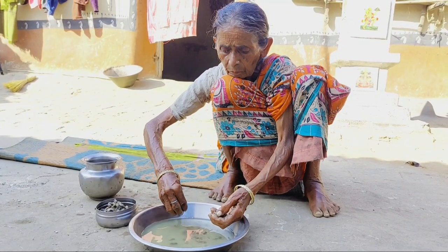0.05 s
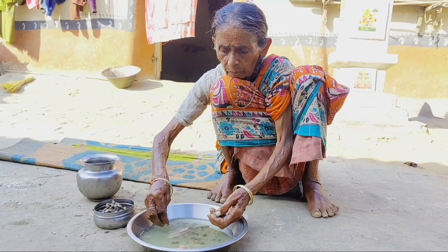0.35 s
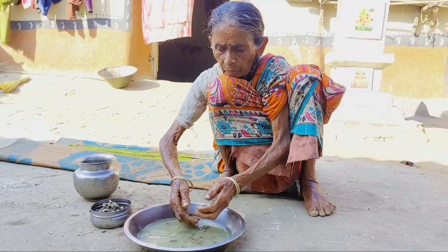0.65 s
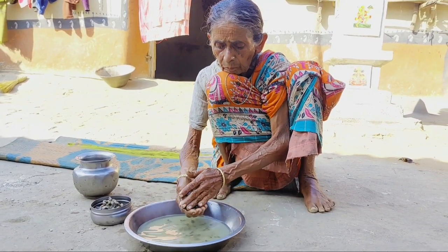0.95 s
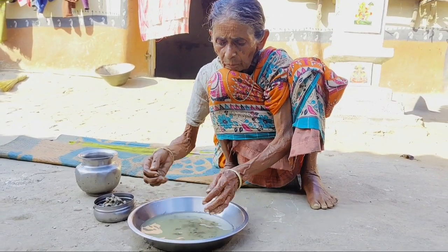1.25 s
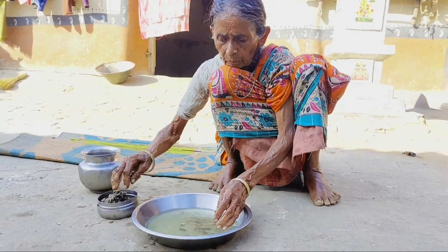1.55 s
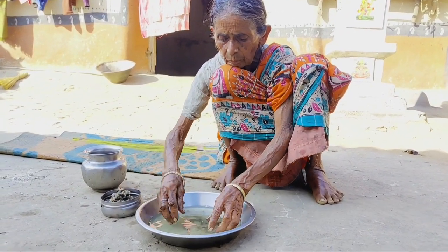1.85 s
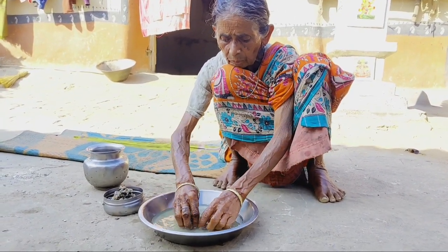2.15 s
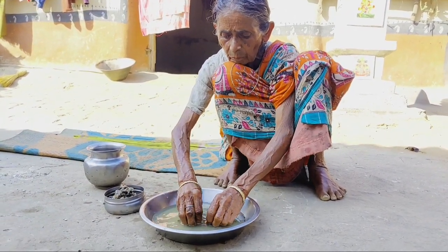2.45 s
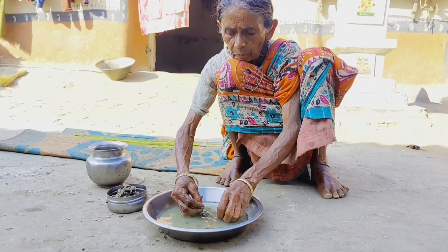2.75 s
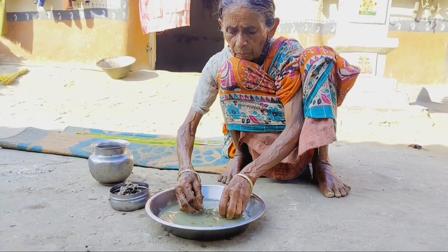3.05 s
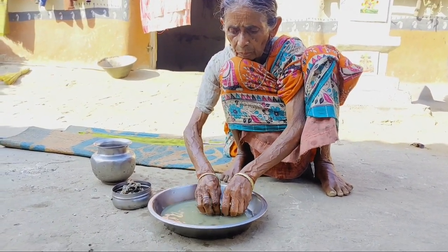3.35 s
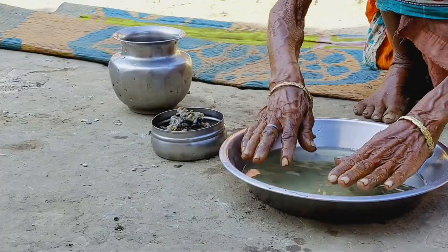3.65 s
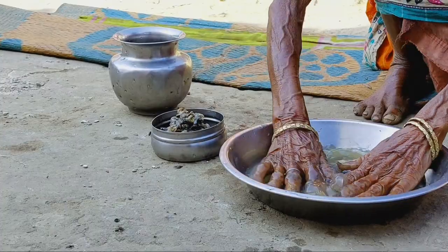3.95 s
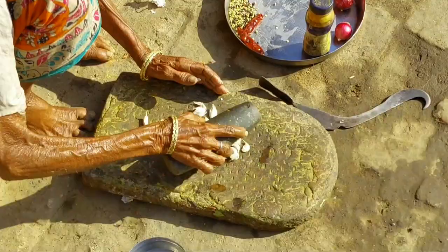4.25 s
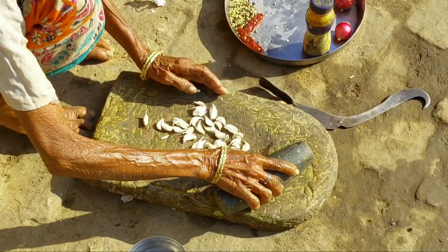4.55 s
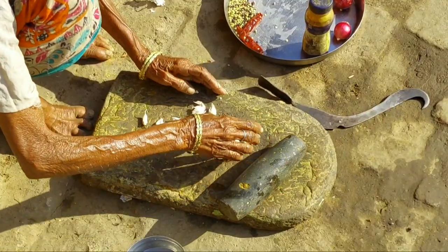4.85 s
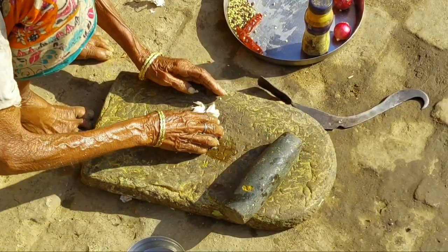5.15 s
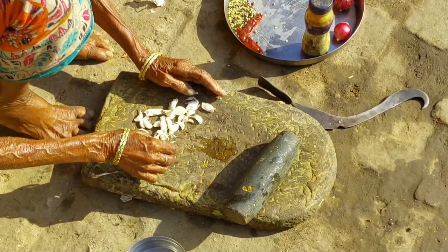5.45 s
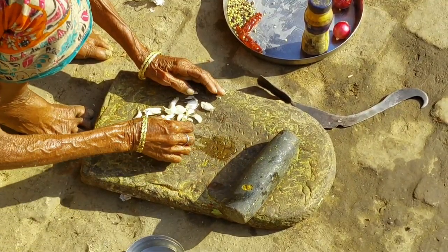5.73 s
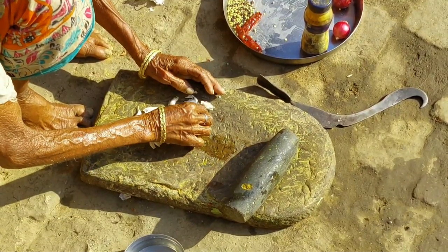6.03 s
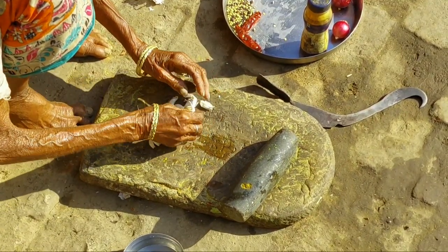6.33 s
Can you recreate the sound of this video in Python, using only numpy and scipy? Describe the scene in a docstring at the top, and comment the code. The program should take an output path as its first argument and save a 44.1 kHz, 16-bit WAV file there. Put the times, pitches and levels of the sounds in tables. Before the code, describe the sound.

Chicks peep throughout this outdoor yard scene, joined for the first two thirds by a hen's short, rough clucks. Light sloshing in a steel pan grows into splashes and plinking drops, and a few chicks give longer falling cries. Then comes the loudest sound, a nearby stone roller knocking once on a slab, followed by a dull scuff and the faint rustle of garlic skins. Everything echoes briefly off the house walls.

```python
"""Hen and chicks in a village yard

A hen clucks in rough pulses from her throat while her chicks whistle short, falling peeps.
Someone washes food in a steel pan of water, and bangles clink now and then. Then a stone roller
lands on a grinding slab with one hard, ringing knock, and a hand sweeps garlic cloves together.
A small bird calls far off, and the house walls give a short echo."""
import sys
import numpy as np
from scipy import signal
from scipy.io import wavfile

SR = 44100
rng = np.random.default_rng(int(sys.argv[2]) if len(sys.argv) > 2 else 0)


def transcribe(u):
    """Save the signal u as a 16-bit wav file named by the first command-line argument.

    u: samples, shape (n,) or (channels, n), limited to [-1, 1]; the rate is SR.
    q: integer samples, one column per channel.
    """
    v = np.clip(np.atleast_2d(u).T, -1, 1)
    q = np.round(v * 32767).astype(np.int16)
    wavfile.write(sys.argv[1], SR, q)


N = 290619
TIME = np.arange(N) / SR


def from_db(db):
    """Turn decibels into a number to multiply a sound by."""
    return 10 ** (np.asarray(db) / 20)


def unit_power(x):
    """Scale a sound so that its average power is 1."""
    return x / np.sqrt(np.mean(x ** 2) + 1e-20)


def at_hz(points, hz):
    """Read between the rows of a table of frequencies, spaced in octaves."""
    frequencies, values = np.transpose(points)
    return np.interp(np.log(hz), np.log(frequencies), values)


def cut(x, hz, kind, order=2):
    """Keep the lows, the highs or a band; a higher order cuts more sharply."""
    sections = signal.butter(order, np.clip(hz, 10, .45 * SR), kind, fs=SR, output="sos")
    return signal.sosfilt(sections, x + 1e-18)


def resonance(x, hz, width_hz):
    """Let through the sound near one frequency, as a hollow space does."""
    r = np.exp(-np.pi * width_hz / SR)
    feedback = [1, -2 * r * np.cos(2 * np.pi * hz / SR), r * r]
    return signal.lfilter(np.array([1, 0, -1]) * (1 - r * r) / 2, feedback, x + 1e-18)


def drift(per_s, size=N):
    """A random wobble, about 1 in size, that heads for a new value per_s times a second."""
    return np.interp(np.arange(size) * per_s / SR, np.arange(4000), rng.standard_normal(4000))


def panned(x, pan_db):
    """Place a sound: positive pan_db is to the left, negative to the right."""
    return x * from_db([[pan_db / 2], [-pan_db / 2]])


def add(out, start_s, x):
    """Mix x into out, beginning at start_s."""
    i = max(round(start_s * SR), 0)
    out[..., i:i + x.shape[-1]] += x[..., :max(N - i, 0)]


def loudness_curve(rows):
    """Join (time_s, level_db) points into a loudness that changes over time."""
    return from_db(np.interp(TIME, *np.transpose(rows)))


def stroke(start_s, length_s, rise, release_s):
    """Loudness of one movement: it builds over the share 'rise' of its length, holds, then fades."""
    build = np.clip((TIME - start_s) / (rise * length_s), 0, 1)
    return build * np.exp(-np.clip((TIME - start_s - length_s) / release_s, 0, 20))


# How alike noise is in the two ears: frequency_hz, likeness (0 to 1)
EAR_LIKENESS = [(60, 0.55), (400, 0.69), (1500, 0.073), (4000, 0.049), (12000, 0.063)]
def shaped_noise(spectrum, flicker_db, grains_per_s=0, spread_db=0):
    """Stereo noise, smooth or made of tiny clicks, in half-octave bands that each flicker."""
    feed = rng.standard_normal((2, 2, N))
    if grains_per_s:
        sizes = from_db(spread_db * np.minimum(rng.exponential(1, N), 4))
        feed = feed * sizes * (rng.random((2, 1, N)) < grains_per_s / SR)
    out, edges = np.zeros((2, N)), 22 * 2 ** np.arange(0, 10, .5)
    for k, (low, high) in enumerate(zip(edges, edges[1:])):
        if high < spectrum[0][0] or low > spectrum[-1][0]:
            continue
        hz = np.sqrt(low * high)
        mid, side = cut(feed[k % 2], [low, high], "band")
        alike = np.clip(at_hz(EAR_LIKENESS, hz), 0, 1)
        gain = from_db(at_hz(spectrum, hz) + flicker_db * drift(25))
        out += gain * (np.sqrt(1 + alike) * mid + np.sqrt(1 - alike) * side * [[1], [-1]])
    return unit_power(out)


def struck(blows, tones, rattle, lag_ms=0, ear_radians=0):
    """Each blow rings all of an object's tones, which fade 60 dB in ring_s, with a gritty crunch."""
    out, t = np.zeros((2, N)), np.arange(SR // 2) / SR
    ring = np.zeros((2, len(t)))
    for k, (hz, level_db, ring_s, pan_db) in enumerate(tones):
        tone = np.sin(2 * np.pi * hz * t - np.array([[0], [ear_radians]]))
        ring += (-1) ** k * panned(from_db(level_db - 60 * t / ring_s) * tone, pan_db)
    for start_s, strength_db in blows:
        for ear in (0, 1):
            add(out[ear], start_s + ear * lag_ms / 1000, from_db(strength_db) * ring[ear])
    size = SR // 25
    crunch = unit_power(rng.standard_normal((2, size)) * np.exp(-t[:size] / .007)) / np.sqrt(size)
    return out + rattle * signal.oaconvolve(out, crunch, axes=1)[:, :N]


def walls(x, early_db, tail_db, ring_s):
    """Add a few echoes from the ground and house fronts, then a blurred, fading tail."""
    t = np.arange(int(.7 * SR)) / SR
    mid, side = rng.standard_normal((2, len(t)))
    side = 0.75 * side + cut(side, 1276, "high")   # the ears differ more in the treble
    tail = (mid + side * [[1], [-1]]) * from_db(-60 * t / ring_s) * np.clip(t / 0.015 - .3, 0, 1)
    echo = from_db(tail_db) * unit_power(tail) / np.sqrt(len(t))
    for k, delay_s in enumerate([.009, .0135, .024, .037]):
        for ear in (0, 1):
            echo[ear, int(delay_s * SR) + rng.integers(0, 6)] += from_db(early_db - 2.1 * k)
    return x + signal.oaconvolve(x * np.ones((2, 1)), echo, axes=1)[:, :N]


# Loudness of the outdoor air: time_s, level_db
AIR_LEVEL = [(0, -65), (2.6, -62.5), (3.3, -61), (4.1, -55.5), (5.0, -53), (6.1, -58.5), (6.59, -59)]
# Tone of the still air by the house and the fuller air by the slab: frequency_hz, level_db
HOUSE_AIR = [(35, -1), (60, 10), (146, 10.5), (389, -7.5), (803, -13.5), (1620, -14), (2840, -86),
             (3760, -46.5), (4970, -39), (5860, -25), (6580, -21), (14600, -28), (16000, -50)]
SLAB_AIR = [(24, -35.5), (40, -13.5), (91, -5), (130, 0.5), (200, -6.5), (448, -8), (514, -19),
            (889, -20.5), (1150, -26), (1490, -31), (2400, -28.5), (3120, -63), (5280, -120)]
def yard_air(rumble_hz=55):
    """Still air gives way to fuller air and a faint hiss; a low rumble swells, then lingers."""
    by_slab = np.interp(TIME, [4.1, 4.45], [0, 1])
    calm = (1 - by_slab) * shaped_noise(HOUSE_AIR, flicker_db=2.7)
    fuller = by_slab * shaped_noise(SLAB_AIR, flicker_db=-0.2)
    hiss = by_slab * shaped_noise([(2000, -3), (5000, -3.5), (8000, 0), (15500, -10)], flicker_db=6.5)
    rumble = resonance(rng.standard_normal(N), rumble_hz, width_hz=20)
    rumble = unit_power(resonance(rumble, rumble_hz, width_hz=40))
    swell = from_db(-52) * stroke(4.3, 0.47, rise=0.4, release_s=0.19) + from_db(-69) * by_slab
    return loudness_curve(AIR_LEVEL) * (calm + fuller) + from_db(-74) * hiss + swell * rumble


# The far bird's loudness as it tires: time_s, level_db
BIRD_LEVEL = [(0, -62), (1.35, -61), (1.6, -72), (3.5, -70), (4.0, -90)]
# The lower band of its voice: frequency_hz, level_db
BIRD_VOICE = [(2800, -22), (3300, 0.5), (3900, 5), (4500, -18.5)]
def far_bird(first_s=.06, every_s=.191, half_note_s=.042, upper_hz=5850):
    """A small bird repeats one note, smeared by distance into two soft bands over faint chatter."""
    from_note_s = (TIME - first_s + every_s / 2) % every_s - every_s / 2
    swell = loudness_curve(BIRD_LEVEL) * np.exp(-(from_note_s / half_note_s) ** 2)
    lower = unit_power(cut(shaped_noise(BIRD_VOICE, flicker_db=2), 4400, "low", order=8))
    upper = resonance(rng.standard_normal((2, N)), upper_hz, width_hz=450)
    upper = unit_power(resonance(upper, upper_hz, width_hz=450))
    chatter = from_db(-79) * lower
    return swell * (from_db(-5) * lower + from_db(-9) * upper) + chatter


# Bangles touching: start_s, strength_db
BANGLE_CLINKS = [(1.672, 1), (4.4353, 7), (4.452, -1), (4.505, -25)]
# The tones they ring with: pitch_hz, level_db, ring_s, pan_db
BANGLE_TONES = [(7400, -55, .06, 0), (9470, -48, .06, -3), (10550, -50, .04, 0), (11150, -50, .05, 0),
                (14720, -50, .05, -2), (15430, -50, .05, -3)]
def bangles():
    """Bangles knock together and ring, very high and very briefly."""
    return from_db(-9) * struck(BANGLE_CLINKS, BANGLE_TONES, rattle=0.7, lag_ms=-.1)


# Knocks that ring the pan, a bangle's and lastly a splash's: start_s, strength_db
PAN_KNOCKS = [(3.5912, 2), (3.602, -19), (3.6105, -7), (3.669, -6.5)]
# Tones of the pan with water in it: pitch_hz, level_db, ring_s, pan_db
PAN_TONES = [(940, -50.5, 0.38, 1), (1296, -60, 0.4, 4), (1385, -37, 0.029, 13), (2730, -44.5, 0.028, -22),
             (2945, -47, 0.2, 3), (3740, -54, 0.13, 6), (5140, -47, 0.085, 9), (5210, -50, 0.13, 25),
             (5640, -53, 0.053, 7), (7420, -48, 0.044, -2), (9030, -66, 0.08, 6), (10800, -67, .07, -3),
             (11830, -66, .07, -2), (13100, -56, 0.064, -16)]
def steel_pan():
    """The steel pan rings and rattles when a bangle knocks against it or water splashes into it."""
    return from_db(-1.5) * struck(PAN_KNOCKS, PAN_TONES, rattle=0.93, lag_ms=0.19)


# Hands moving through the water: start_s, length_s, spray_db, slosh_db
WASH_STROKES = [(0.044, 0.16, -73, -88), (0.66, 0.037, -74.5, -101), (1.202, 0.042, -71, -68),
                (1.355, 0.016, -72, -94), (1.544, 0.03, -63, -56), (1.806, 0.065, -73.5, -90),
                (2.136, 0.1, -72.5, -88), (2.591, 0.028, -59, -59.5), (2.636, 0.086, -60, -74),
                (3.102, 0.17, -66, -73.5), (3.389, 0.017, -61.5, -60), (3.424, 0.013, -89, -60.5),
                (3.589, 0.0096, -49, -56.5), (3.663, 0.027, -54, -50.5), (3.745, 0.12, -59.5, -59.5),
                (3.957, 0.22, -52, -52.5), (4.248, 0.011, -63, -53.5)]
# Tone of the spray: frequency_hz, level_db
SPRAY_TONE = [(1800, -15), (2800, -5.5), (4000, 1.5), (5500, -6), (8000, -7), (12000, -10), (15500, -8.5)]
def washing(trickle_end_s=4.5):
    """Stirring makes fine spray, a wet crackle and a slosh of small bubbles."""
    spray = from_db(-82.5 + 4 * drift(4)) * (TIME < trickle_end_s)   # a trickle between strokes
    slosh = np.zeros(N)
    for start_s, length_s, spray_db, slosh_db in WASH_STROKES:
        push = stroke(start_s, length_s, rise=0.58, release_s=0.039)
        spray += from_db(spray_db) * push
        slosh += from_db(slosh_db) * push
    mist = shaped_noise(SPRAY_TONE, flicker_db=5, grains_per_s=8100, spread_db=0.5)
    crackle = shaped_noise(SPRAY_TONE, flicker_db=2, grains_per_s=350, spread_db=2)
    bubble_tone = [(600, -21.5), (950, 0.5), (1350, 10.5), (1900, -2), (2800, 7.5)]
    bubbles = shaped_noise(bubble_tone, flicker_db=-3, grains_per_s=1500, spread_db=3)
    return from_db(2.5) * (spray * mist + slosh * bubbles) + from_db(-3) * spray * crackle


# Single drops in the pan: start_s, pitch_hz, rise_octaves_per_s, ring_s, level_db
WATER_DROPS = [(2.58, 2670, 31, 0.18, -57), (4.053, 3320, 0.82, .04, -52), (4.111, 1190, 7.3, 0.1, -41),
               (4.125, 898, 6.5, .09, -40), (4.153, 1110, 6.8, .05, -34.5), (4.17, 3940, 89, 0.016, -28),
               (4.254, 1582, 6.9, 0.063, -36.5)]
def drops():
    """Each drop is a quick plink that rises in pitch by up to half an octave."""
    out, t = np.zeros((2, N)), np.arange(SR // 16) / SR
    for start_s, pitch_hz, rise, ring_s, level_db in WATER_DROPS:
        phase = 2 * np.pi * np.cumsum(pitch_hz * 2 ** np.minimum(rise * t, .5)) / SR
        loudness = from_db(level_db - 60 * t / ring_s) * (1 - np.exp(-t / 0.00056))
        add(out, start_s, np.sin(phase) * loudness)
    return out


# Small splashes and the snap of dry skins: start_s, level_db, pan_db
SNAPS = [(0.657, -52, 0), (2.599, -57, -2), (2.6653, -42.5, -2), (3.4617, -51, -8), (3.5916, -45, 0),
         (3.669, -38.5, 0), (3.964, -45, 0), (4.255, -45.5, 2), (4.57, -43, -7.5), (6.0716, -50.5, -4.5),
         (6.159, -54.5, -14.5), (6.2362, -53, -6)]
def snaps(gain_db=-5, snap_s=0.0045, spatter_s=0.007):
    """Tiny bright bursts of noise, each with a short spatter after it."""
    out, t = np.zeros((2, N)), np.arange(SR // 10) / SR
    fade = np.exp(-t / snap_s) + 0.11 * np.exp(-t / spatter_s)
    for start_s, level_db, pan_db in SNAPS:
        burst = cut(rng.standard_normal((2, len(t))) * fade, 3200, "high")
        add(out, start_s, panned(burst, pan_db) * from_db(level_db + gain_db))
    return out


# Cloves rustling over the slab, first shifted as the roller lands, then swept by hand: start_s, length_s,
# level_db
CLOVE_RUSTLES = [(4.575, .04, -61.5), (5.101, 0.22, -54), (5.4, 0.21, -66), (6.236, 0.099, -63.5),
                 (6.475, 0.041, -67.5)]
# Tone of their dry skins: frequency_hz, level_db
SKIN_TONE = [(2000, -10), (3000, 2), (5000, 2.5), (8000, 1.5), (12000, 2.5), (15500, 2)]
def garlic_cloves():
    """Dry garlic skins rustle in thousands of tiny clicks as they are shifted and swept together."""
    sweeps = sum(from_db(level_db) * stroke(start_s, length_s, rise=.7, release_s=.06)
                 for start_s, length_s, level_db in CLOVE_RUSTLES)
    return sweeps * shaped_noise(SKIN_TONE, flicker_db=2, grains_per_s=9000, spread_db=2)


# Tone of the scuff: frequency_hz, level_db
SCUFF_TONE = [(400, -15), (700, -4), (1000, -8.5), (1250, 1), (1600, -17.5), (2500, -33)]
def scuff(start_s=4.89, length_s=0.11, level_db=-42.5):
    """One short, dull scuff that swells and stops."""
    rub = unit_power(cut(shaped_noise(SCUFF_TONE, flicker_db=5), 1260, "low", order=8))
    return from_db(level_db) * stroke(start_s, length_s, rise=0.76, release_s=0.042) * rub


# The roller hitting the slab: start_s, strength_db
ROLLER_KNOCKS = [(4.5693, 0), (4.5831, -9)]
# Tones of roller and slab: pitch_hz, level_db, ring_s, pan_db
STONE_TONES = [(305, -34, .14, -2), (370, -36, .1, -2), (450, -29, .13, -2), (528, -19.5, .13, -6),
               (610, -27, .07, -4), (688, -23, .1, -6), (765, -24, .07, -5), (880, -25, .11, -4),
               (1058, -31, .1, 0), (1288, -25, .09, 2), (1530, -35, .07, 1), (1755, -29, .07, 0),
               (1815, -32, .06, 0), (2170, -22, .12, -4), (2340, -25, .1, -2), (2400, -19, .065, -2),
               (3332, -20, .057, -1), (3560, -27, .035, 2), (3800, -28, .03, 3), (4700, -33, .02, 3),
               (6500, -46, .05, 0)]
# The soft bump as the roller settles: frequency_hz, level_db
BUMP_TONE = [(300, -9), (430, -2), (600, -7), (800, -31), (1200, -38)]
def stone_roller(thud_s=0.025, grit_s=0.1096):
    """Stone lands on stone, rocks once and rings over a thud; grit trickles and the roller settles."""
    out = struck(ROLLER_KNOCKS, STONE_TONES, rattle=.1, lag_ms=.02, ear_radians=1.15)
    t = np.arange(SR // 4) / SR
    for start_s, strength_db in ROLLER_KNOCKS:
        thud = unit_power(cut(rng.standard_normal(len(t)), [220, 1300], "band"))
        grit = unit_power(cut(rng.standard_normal((2, len(t))), [4400, 5300], "band"))
        crunch = from_db(-24) * thud * np.exp(-t / thud_s) + from_db(-57) * grit * np.exp(-t / grit_s)
        add(out, start_s, from_db(strength_db) * crunch)
    knock = from_db(3.5) * cut(cut(out, 4900, "low", order=8), 150, "high")
    settle = from_db(-49) * stroke(4.828, .025, rise=0.36, release_s=0.017)
    bump = settle * shaped_noise(BUMP_TONE, flicker_db=5.5)
    return walls(knock, early_db=-26, tail_db=-19.5, ring_s=.36) + bump


def chick_voice(pitch_hz, swell, waver, flutter_db, octave_db, rasp=.1):
    """An unsteady whistle with a fast rasp; below 3850 Hz a faint tone an octave up joins in."""
    size = len(pitch_hz)
    phase = 2 * np.pi * np.cumsum(pitch_hz * (1 + waver * drift(600, size))) / SR
    loudness = swell * signal.windows.tukey(size, .3) * from_db(flutter_db * drift(200, size))
    loudness *= 1 + rasp * drift(2000, size)
    octave = from_db(octave_db) * np.clip((3850 - pitch_hz) / 220.8, 0, 1)
    return loudness * (np.sin(phase) + octave * np.sin(2 * phase))


PEEP_GLIDE_S, PEEP_FALL_OCTAVES = 0.05, .26
def peep(glide_s, from_hz, to_hz, octave_db):
    """A short whistle that arches over and falls, loudest in the middle; no two are quite alike."""
    stretch, bow = rng.uniform(-1, 1, 2)
    size = int(1.3 * glide_s * (1 + 0.14 * stretch) * SR)
    progress = np.linspace(-.1, 1.2, size)   # the note runs past both ends of the glide
    fall = progress + (.2 + .3 * bow) * progress * (progress - 1)
    pitch_hz = from_hz * (to_hz / from_hz) ** fall
    swell = np.interp(progress, [0, .5, 1], [.6, 1, .55])
    return chick_voice(pitch_hz, swell, waver=.018, flutter_db=4, octave_db=octave_db)


def far_chicks(per_s=16):
    """The rest of the brood peeps at random further away, more softly in the middle of the scene."""
    out = np.zeros(N)
    for k, (when, high, soft) in enumerate(rng.random((int(per_s * N / SR), 3))):
        start_s, from_hz = (k + when) / per_s, 3700 + 700 * high
        level_db = -67 + np.interp(start_s, [1.4, 2.2, 5, 6], [-3, -19.5, -12, -1.5]) - 4.7 * soft
        note = peep(PEEP_GLIDE_S, from_hz, from_hz / 2 ** PEEP_FALL_OCTAVES, octave_db=-30)
        add(out, start_s, note * from_db(level_db))
    return walls(out, early_db=-9, tail_db=-4, ring_s=0.304)


# Peeps of the nearest chicks: start_s, pitch_hz, level_db, pan_db
NEAR_PEEPS = [(.035, 4200, -57, -2), (0.08, 4050, -59, -2), (0.125, 4060, -59, 2), (.228, 3920, -60, -5),
              (.315, 3340, -64, -8), (0.405, 4235, -55, -1), (.46, 4060, -64.5, -2), (.541, 4230, -60, 0),
              (.723, 4415, -55.5, 1), (.775, 4120, -63.5, -9), (0.902, 4235, -56.5, -1),
              (1.017, 4300, -55, 0), (1.153, 4450, -54.5, 1), (1.188, 4405, -54, -2),
              (1.33, 4170, -58.5, -1), (1.41, 4280, -57, -3), (1.595, 4200, -57, -2),
              (1.969, 4200, -55, -4), (2.106, 4310, -54.5, 0), (2.27, 3690, -65.5, -1),
              (2.473, 4130, -64, -1), (2.728, 4120, -56, -1), (2.846, 4260, -59, 1),
              (2.992, 4320, -55.5, 3), (3.495, 3870, -59, -2), (3.931, 3850, -57, -1),
              (4.524, 4250, -60.5, -5), (6.02, 4620, -64, 7), (6.2, 3585, -58, 0.5), (6.505, 4470, -60, 1)]
def chick_peeps(gain_db=1.5):
    """The nearest chicks give short peeps from left and right."""
    out = np.zeros((2, N))
    for start_s, pitch_hz, level_db, pan_db in NEAR_PEEPS:
        note = peep(PEEP_GLIDE_S, pitch_hz, pitch_hz / 2 ** PEEP_FALL_OCTAVES, octave_db=-26.5)
        add(out, start_s - PEEP_GLIDE_S / 10, panned(note * from_db(level_db + gain_db), pan_db))
    return out


# Long falling cries: start_s, length_s, from_hz, to_hz, level_db, strain (0 to 1)
LONG_CRIES = [(1.395, 0.17, 3420, 2770, -56.5, 0.12), (1.777, .13, 4550, 2634, -56, 0.35),
              (3.116, 0.13, 3475, 2368, -50, 0.38), (4.017, .11, 3744, 2198, -40.5, 0.7),
              (4.328, .092, 3830, 2210, -41.5, 0.92)]
# The course of a fully strained cry: share_of_length, share_of_fall, loudness (all 0 to 1)
STRAINED_CRY = [(0, 0.051, 0.3), (.3, 0.17, .35), (0.549, .68, 0.87), (.8, .92, .9), (1, 1, 0.41)]
def chick_cries(gain_db=4.5, pan_db=-7.5):
    """An easy cry glides evenly; a strained one drops, then levels out as it swells and turns raspy."""
    out = np.zeros((2, N))
    shares, falls, loudness = np.transpose(STRAINED_CRY)
    for start_s, length_s, from_hz, to_hz, level_db, strain in LONG_CRIES:
        progress = np.linspace(0, 1, int(length_s * SR))
        fall = progress + strain * (np.interp(progress, shares, falls) - progress)
        pitch_hz = from_hz * (to_hz / from_hz) ** fall
        swell = np.interp(progress, shares, loudness) ** ((1 + strain) / 2)
        cry = chick_voice(pitch_hz, swell, waver=0.011 + .045 * strain * progress,
                          flutter_db=5.5, octave_db=-19.5, rasp=0.22 * strain * progress)
        add(out, start_s, panned(cry * from_db(level_db + gain_db), pan_db))
    return out


# Calls of one chick by the slab: start_s, level_db, opener_db (compared with the main note)
TWO_PART_CALLS = [(4.677, -51, -9), (4.927, -55, -8), (5.353, -54, -4), (5.583, -57.5, -6),
                  (5.847, -56, -5), (6.118, -54.5, -9), (6.332, -53, -4), (6.585, -55, 0)]
def chick_calls(gain_db=3.5):
    """One chick repeats a call: a high opening peep just ahead of a lower main note."""
    out = np.zeros((2, N))
    for start_s, level_db, opener_db in TWO_PART_CALLS:
        place = panned(from_db(level_db + gain_db), pan_db=1)
        opener = from_db(opener_db) * peep(.04, from_hz=5400, to_hz=4140, octave_db=-30)
        main_note = peep(.051, from_hz=3880, to_hz=3046, octave_db=-11)
        add(out, start_s - .043, place * opener)
        add(out, start_s - .0051, place * main_note)
    return out


def near_chicks(ear_lag_s=.00006, far_wall_s=.043, far_wall_db=-14):
    """Peeps, cries, calls and one long, level whistle, all thrown back by a far wall."""
    out = chick_peeps() + chick_cries() + chick_calls()
    held_hz = np.full(int(0.32 * SR), 2380)
    whistle = chick_voice(held_hz, from_db(-70.5), waver=.04, flutter_db=4.5, octave_db=-40)
    add(out, 0.92, panned(whistle, pan_db=-19))
    out[1] = np.interp(TIME - ear_lag_s, TIME, out[1])   # the right ear hears them a little later
    add(out, far_wall_s, from_db(far_wall_db) * out[::-1])   # the echo swaps left and right
    return walls(out, early_db=-9.5, tail_db=-4, ring_s=0.23)


# The hen's clucks: start_s, length_s, pitch_hz (near the top of the leap), level_db
HEN_CLUCKS = [(0.146, 0.054, 335.4, -32), (.507, 0.055, 384.4, -34), (0.826, 0.058, 373.8, -34.5),
              (1.226, 0.052, 384.3, -33), (1.55, 0.044, 365.4, -34.5), (1.854, 0.054, 362, -33),
              (2.211, 0.045, 377, -35), (2.565, 0.051, 342.5, -33), (2.993, 0.053, 341, -34.5),
              (3.412, 0.061, 369.4, -33.5), (3.765, 0.045, 349.5, -30), (4.183, .062, 378.4, -31.5),
              (6.475, 0.091, 322.5, -39.5)]
def hen(roughness=0.078, usual_pitch_hz=367.3, gain_db=-6):
    """A cluck is a rough run of pulses that leaps up in pitch and sags, through a nearly closed beak."""
    out = np.zeros((2, N))
    for start_s, length_s, pitch_hz, level_db in HEN_CLUCKS:
        size = int(length_s * SR)
        progress = np.arange(size) / size
        leap = np.interp(progress, [0, .35, .65, 1], [0.2852, 1, 1.02, 0.69])
        pulse_hz = pitch_hz * leap * (1 + roughness * drift(307.5, size))
        pulses = np.diff(np.floor(np.cumsum(pulse_hz) / SR), prepend=-1)   # one click per cycle
        pulses *= 1 + drift(393.8, size)
        raspy = unit_power(pulses) + rng.standard_normal(size)
        swell = np.interp(progress, [0, .2, .42, .7, 1], [.2, .6, 1, .7, .1])
        source = np.pad(raspy * swell, (0, 900))   # leave time for the throat to ring
        # A higher cluck has a higher throat resonance and a more open beak.
        throat = resonance(source, 1.75 * pitch_hz, width_hz=330)
        throat = throat - 0.32 * resonance(source, 953, 276) + 0.12 * resonance(source, 360, 170)
        beak_opening = from_db(-16 + 0.25 * (pitch_hz - usual_pitch_hz))
        muffled = cut(cut(throat, 1130, "low", order=8), 240, "high", order=3)
        cluck = unit_power(muffled + beak_opening * cut(throat, 2000, "low"))
        pan_db = np.interp(start_s, [2, 3], [-2.2, 0])   # she drifts from the right to the middle
        add(out, start_s, panned(cluck, pan_db) * from_db(level_db + gain_db))
    return walls(out, early_db=-11.5, tail_db=-0.5, ring_s=0.22)


def scene():
    """Mix the washing, the birds, the work on the slab and the air of the yard."""
    metal = steel_pan() + bangles()
    on_slab = garlic_cloves() + scuff()
    chores = walls(washing() + drops() + metal + snaps(), early_db=-11, tail_db=-16.5, ring_s=0.3)
    birds = hen() + near_chicks() + far_chicks() + far_bird()
    return birds + chores + on_slab + stone_roller() + yard_air()


def record(dry, cutoff_hz=15800):
    """Cut away the very highest treble, steeply."""
    return signal.sosfilt(signal.ellip(10, .1, 80, cutoff_hz, fs=SR, output="sos"), dry)


dry = scene()
out = record(dry)
transcribe(out)
```